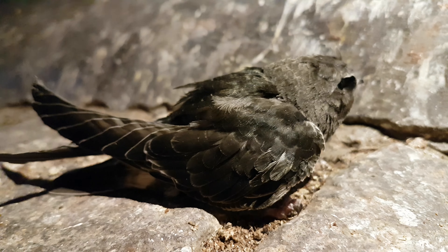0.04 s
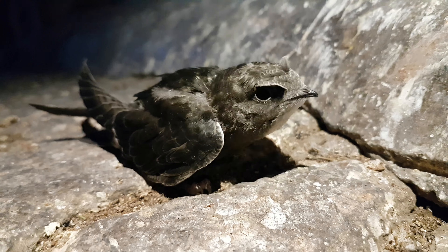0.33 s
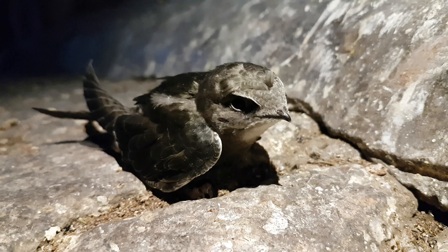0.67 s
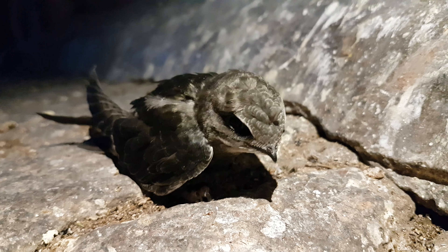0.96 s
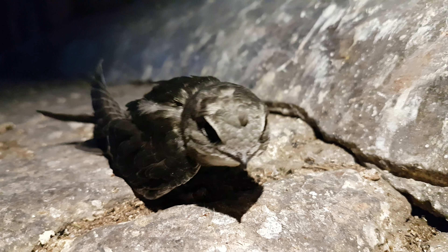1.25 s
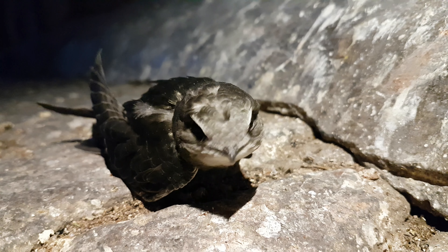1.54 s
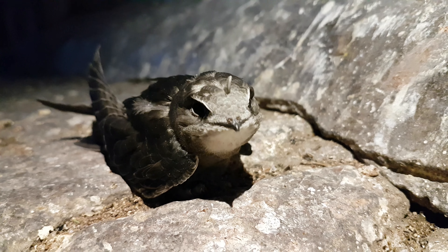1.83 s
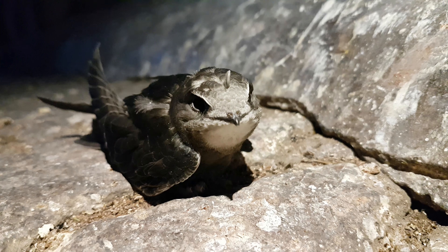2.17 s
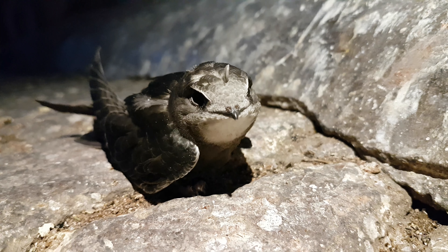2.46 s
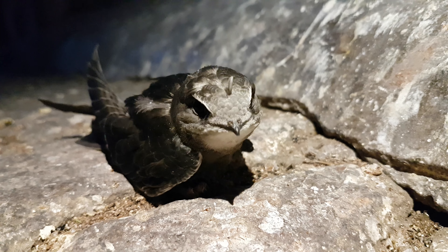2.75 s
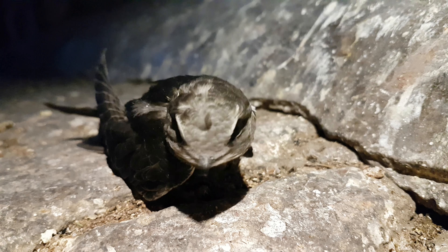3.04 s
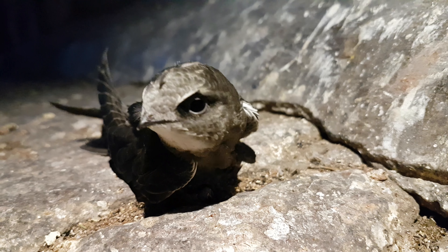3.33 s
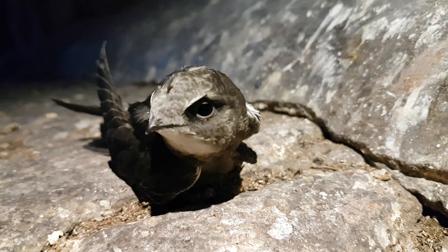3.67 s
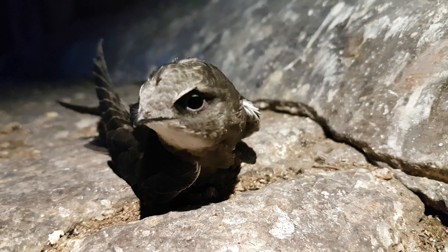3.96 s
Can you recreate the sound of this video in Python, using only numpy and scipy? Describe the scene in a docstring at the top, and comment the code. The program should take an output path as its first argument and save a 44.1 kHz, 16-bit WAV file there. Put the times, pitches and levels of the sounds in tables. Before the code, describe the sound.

Shrill swift screams and rapid trills build into a large chorus beside a stone wall.

```python
"""Faint, shrill screams of swifts cut out for a moment, then swell into a full colony by a stone wall.
Each call is a frequency-modulated whistle with its octave: an arched scream or a trill of falling pips,
made rasping by a fast random tremor. A few birds are close; hundreds more superpose into a shrill wash,
and the wall scatters a short echo. Underneath, the air rumbles softly and one bird scuffs the rock."""
import sys
import numpy as np
from scipy import signal
from scipy.fft import rfft, irfft
from scipy.io import wavfile
from scipy.ndimage import uniform_filter1d

SR = 44100
rng = np.random.default_rng(int(sys.argv[2]) if len(sys.argv) > 2 else 0)


def generate_wav(signal):
    """Clip the signal to [-1, 1] and save it as 16-bit WAV at the path in sys.argv[1]."""
    frames = np.transpose(np.atleast_2d(signal))
    scaled = np.clip(frames, -1, 1) * 32767
    pcm = np.round(scaled).astype(np.int16)
    wavfile.write(sys.argv[1], SR, pcm)


N = 176400
T = np.arange(N) / SR
LEFT_DB, MAX_LAG_S = -2, .0004  # left minus right level (the birds lie to the right); channel delay


def undb(db):
    """Amplitude ratio of a level in decibels."""
    return 10 ** (np.asarray(db) / 20)


def unit(x):
    """Normalisation to rms 1."""
    return x / np.sqrt(np.mean(x ** 2) + 1e-18)


def curve(rows, column=1):
    """Gain envelope: a level column interpolated over time."""
    rows = np.array(rows)
    return undb(np.interp(T, rows[:, 0], rows[:, column]))


def colour(x, points):
    """Spectral shaping by (f/Hz, level/dB) points, with a steep roll-off beyond the ends."""
    hz, db = np.array(points).T
    log_f = np.log(np.maximum(np.fft.rfftfreq(N, 1 / SR), 1))
    beyond = np.abs(log_f - np.clip(log_f, np.log(hz[0]), np.log(hz[-1])))
    return irfft(rfft(x) * undb(np.interp(log_f, np.log(hz), db) - 34 * beyond), N)


def walk(cutoff_hz):
    """Low-pass noise of rms 1: a smooth random modulator."""
    f = np.fft.rfftfreq(N, 1 / SR)
    return unit(irfft(rfft(rng.standard_normal(N)) / (1 + (f / cutoff_hz) ** 4), N))


# Spectrum of the moving air: f/Hz, relative spectral density/dB
AIR_SPECTRUM = [(15, -40), (25, -8.5), (108, 1.5), (193, -2.5), (296, -7), (492, -6.5), (627, -14),
                (1190, -24.5), (1540, -29), (1790, -27.5), (2200, -36), (2860, -59), (4840, -120)]
# Envelopes of the air below and above 250 Hz: t/s, rumble level/dB, wind level/dB
AIR_LEVELS = [(0, -67, -54), (.22, -65, -55.5), (.39, -80.5, -68.5), (.48, -76, -78), (.56, -65, -67),
              (.72, -55, -59.5), (1.26, -47, -49.5), (1.76, -45.5, -44.5), (2.05, -41, -46),
              (3, -40.5, -40), (4, -39.5, -37.5)]


def air():
    """Rumble and soft wind: broadband noise, largely coherent between the channels at low frequency."""
    mid, side = colour(rng.standard_normal((2, N)), AIR_SPECTRUM)
    side = colour(side, [(25, -5), (100, -15.5), (300, -7.5), (700, -5.5), (1200, 5.5), (2500, 10)])
    noise = unit(np.array([mid + side, mid - side]))
    rumble = signal.sosfiltfilt(signal.butter(3, 250, fs=SR, output="sos"), noise)
    wind = noise - rumble
    drone = undb(-9.5) * walk(13.7) * np.sin(2 * np.pi * 194.6 * T)  # a faint, narrow noise band
    flicker = undb(walk(10.5))
    return ((rumble + drone) * curve(AIR_LEVELS, 1) + wind * curve(AIR_LEVELS, 2)) * flicker


# Spectrum of rubbing on rock: f/Hz, relative spectral density/dB
FRICTION_SPECTRUM = [(90, 0), (180, -9.5), (450, -1), (750, -11), (1500, -12.5), (3000, -9)]
# Movements of the bird on the rock: onset t/s, duration/s, level/dB
SCUFF_EVENTS = [(1.541, 0.1, -45.5), (2.571, 0.1, -42.5), (3.174, 0.028, -37.5), (3.625, 0.13, -40)]


def scuffs():
    """Friction noise of feathers and feet on rock: a quick rise and a dull, grainy decay."""
    rub = unit(colour(rng.standard_normal(N), FRICTION_SPECTRUM) * undb(2 * walk(120)))
    envelope = np.zeros(N)
    for start, length, db in SCUFF_EVENTS:
        age = np.maximum(T - start, 0) / length * 3
        envelope += undb(db) * age * np.exp(1 - age)
    return envelope * rub


# Spectrum of the distant calls: f/Hz, relative spectral density/dB
CHORUS_SPECTRUM = [(590, -24), (1000, -34), (1550, -37), (1790, -32), (2130, -32), (2970, -16),
                   (4390, -6.5), (5040, -2), (5340, -0.5), (6790, -11.5), (7440, -18), (8340, -14),
                   (9690, -28.5), (10100, -32.5), (11400, -27), (15000, -26.5), (15500, -22)]
# Balance of distant birds against their middle band: t/s, low-voice level/dB, treble level/dB
CHORUS_BALANCE = [(0, 4.5, -7), (.7, 3.5, -0.5), (1.25, 0.5, 1.5), (1.7, 0.5, 3), (2.2, 3, -2.5),
                  (2.8, 1.5, 2), (3.3, 0, 1.5), (4, 7.5, 4.5)]


def far_chorus():
    """Incoherent superposition: countless distant calls blur into a fluttering band of noise."""
    hiss = unit(colour(rng.standard_normal((2, N)), CHORUS_SPECTRUM))
    low = signal.sosfiltfilt(signal.butter(4, 4400, fs=SR, output="sos"), hiss)
    high = signal.sosfiltfilt(signal.butter(4, 7300, "high", fs=SR, output="sos"), hiss)
    middle = hiss - low - high
    chorus = middle + low * curve(CHORUS_BALANCE, 1) + high * curve(CHORUS_BALANCE, 2)
    flutter = unit(undb(1.09 * walk(400) + 1.33 * walk(32)))
    return chorus * flutter * undb(np.array([[LEFT_DB], [-LEFT_DB]]) / 2)


def wall_echo(x, echo_db, t60_s=.16):
    """Diffuse reflection: the stonework adds a short, exponentially decaying tail to the direct sound."""
    t = T[:SR // 2]
    tail = rng.standard_normal((2, len(t))) * undb(-60 * t / t60_s) * (t > .004)
    tail /= np.sqrt(np.sum(tail ** 2, axis=1, keepdims=True))
    return x + undb(echo_db) * signal.fftconvolve(x, tail, axes=1)[:, :N]


def place(out, call, start, pan_db, lag_s):
    """Localisation: a call is added to both channels with a level and a time difference."""
    for channel, side in enumerate((1, -1)):
        onset = int((start - side * lag_s / 2) * SR)
        a, b = max(onset, 0), min(onset + len(call), N)
        if b > a:
            out[channel, a:b] += call[a - onset:b - onset] * undb(side * pan_db / 2)


def throat(rasp_hz=314, waver_hz=45):
    """Vocal tremor: fast jitter of frequency, fast shimmer of amplitude and a slower waver of pitch."""
    return np.array([walk(rasp_hz), walk(rasp_hz), walk(waver_hz)])


def whistle(hz, tremor, offset, rasp, wobble, octave_db):
    """A tone and its second harmonic, modulated by tremor in amplitude (rasp) and frequency (wobble)."""
    jitter, shimmer, waver = tremor.take(np.arange(len(hz)) + int(offset * N), axis=1, mode="wrap")
    phase = 2 * np.pi * np.cumsum(hz * (1 + wobble * jitter + .0069 * waver)) / SR
    envelope = np.sin(np.pi * np.linspace(0, 1, len(hz)) ** 1.02).clip(0) ** .4
    roughness = unit(np.exp(rasp * np.tanh(shimmer)))
    octave = undb(octave_db) * (hz < SR / 5) * np.sin(2 * phase)  # muted where it would near aliasing
    return np.sqrt(2) * envelope * roughness * (np.sin(phase) + octave)


def arch(length, top_hz, depth, crest=.56):
    """Frequency contour of a scream: a parabola up to a crest and down again."""
    progress = np.linspace(0, 1, max(int(length * SR), 64))
    return top_hz * (1 - depth * (2 * (progress - crest)) ** 2)


def pip(hz, length_s=.0221, fall=.0903):
    """Frequency contour of a pip: a downward chirp, level at first."""
    return hz * (1 - fall * np.linspace(0, 1, int(length_s * SR)) ** 2)


WOBBLE_PER_S = .11  # longer screams are rougher
PIP_SPREAD, PIP_SPREAD_DB, PIP_JITTER_S = .02, 2.5, .003  # pip-to-pip scatter of pitch, level, onset


def flock(count, centre_hz, spread, octave_db, rasp, wobble, scatter_db):
    """Superposition of birds at random times and distances, each scream breaking into an uneven trill."""
    out, tremor = np.zeros((2, N)), throat()
    birds = zip(rng.random((count, 6)), rng.standard_normal((count, 5, 3)).clip(-2, 2))
    for k, ((slot, duration, spacing, nearness, bearing, offset), deviations) in enumerate(birds):
        pitch, side, _ = deviations[0]
        start = (k + slot) / count * (N / SR + .5) - .5
        hz = centre_hz * np.exp(spread * pitch)
        length, gap = .025 + .05 * duration, .043 + .022 * spacing
        db = scatter_db * nearness ** 2
        pan_db, lag_s = LEFT_DB + 2.5 * side, MAX_LAG_S * (2 * bearing - 1)
        roughened = wobble + WOBBLE_PER_S * length
        scream = whistle(arch(length, hz, depth=.1), tremor, offset, rasp, roughened, octave_db)
        place(out, undb(db) * scream, start, pan_db, lag_s)
        for j, (late, sharp, loud) in enumerate(deviations[1:]):
            at = start + length + (j + .5) * gap + PIP_JITTER_S * late
            call = whistle(pip(hz * (1 + PIP_SPREAD * sharp)), tremor, offset + at, rasp, wobble, octave_db)
            place(out, undb(db + PIP_SPREAD_DB * loud) * call, at, pan_db, lag_s)
    return unit(wall_echo(out, echo_db=-6.5))


# Envelope of the flocks and the far chorus: t/s, relative level/dB
COLONY_SWELL = [(0, -30), (.1, -34), (.2, -37), (.3, -38.5), (.39, -46), (.48, -41), (.55, -28.5),
                (.71, -22), (.9, -17), (1.1, -12.5), (1.27, -8.5), (1.4, -6), (1.6, -4), (1.85, 0),
                (2.25, 0.5), (2.6, 1), (3.1, 3), (3.55, 2), (3.9, -3), (4, -4)]


def colony():
    """Independent sources add in power: five flocks and the far chorus swell under one envelope."""
    main = flock(48, centre_hz=5380, spread=.035, octave_db=-22, rasp=.4, wobble=.006, scatter_db=7.5)
    harsh = flock(70, centre_hz=5740, spread=.07, octave_db=-22, rasp=.87, wobble=.0303, scatter_db=7)
    low = flock(60, centre_hz=4400, spread=.075, octave_db=-16, rasp=.5, wobble=.014, scatter_db=4)
    thin = flock(26, centre_hz=8490, spread=.0264, octave_db=-25, rasp=.4, wobble=.014, scatter_db=3)
    bright = flock(50, centre_hz=6230, spread=.08, octave_db=-1.5, rasp=.96, wobble=.0107, scatter_db=0)
    voices = (undb(-22) * main + undb(-25) * harsh + undb(-32) * curve(CHORUS_BALANCE, 1) * low
              + undb(-37) * thin + undb(-36) * bright + undb(-21) * far_chorus())
    return voices * curve(COLONY_SWELL)


# Close screams: onset t/s, duration/s, crest f/Hz, arch depth/1, relative level/dB, octave level/dB
CLOSE_SCREAMS = [ (-.03, 0.11, 5620, .06, -49, -24), (.02, .11, 7900, 0.15, -62, -20),
                 (.2, 0.096, 6160, 0.1, -53, -23), (0.705, 0.027, 5800, 0.074, -38.5, -8),
                 (.84, 0.067, 6300, 0.24, -50, 0), (.88, .095, 7500, .03, -65, 17),
                 (1.036, 0.074, 5980, 0.14, -33, -10), (1.16, 0.05, 5620, .1, -29, -12),
                 (1.18, 0.12, 6120, .05, -36, -14), (1.1, .11, 5450, 0.052, -31.5, -27),
                 (1.22, .1, 5320, .05, -27.5, -23), (1.441, .05, 5900, .05, -27, -13),
                 (1.321, 0.05, 5700, .1, -39, 0), (1.53, .1, 6330, .09, -24.5, -20),
                 (1.56, .09, 5300, .06, -29, -7), (1.79, 0.15, 9550, .22, -32.5, -25),
                 (1.8, 0.091, 7000, 0.091, -44, 4), (2.32, 0.044, 6130, 0.052, -19.5, -32),
                 (2.357, 0.05, 6080, 0.07, -15.5, -22), (2.335, 0.094, 8540, .05, -22.5, -23),
                 (2.41, 0.038, 6210, 0.051, -17.5, -20), (2.559, 0.025, 9800, .04, -29.5, -25),
                 (2.58, 0.017, 6750, 0.094, -15, -25), (2.615, 0.14, 6890, .05, -21, -20),
                 (2.69, 0.058, 9640, 0.034, -34, -25), (2.81, .11, 5740, 0.043, -19, -18),
                 (2.9, 0.092, 9270, 0.054, -31, -25), (2.955, 0.025, 5370, 0.072, -12, -23),
                 (3.029, 0.017, 5240, 0.036, -10.5, -32), (3.098, 0.015, 5470, 0.026, -17.5, -21),
                 (3.18, 0.036, 9470, 0.014, -23, -25), (3.215, 0.054, 8500, 0.036, -22.5, -25),
                 (3.284, 0.043, 9350, 0.034, -24, -25), (3.329, 0.012, 5400, 0.086, -13.5, -19),
                 (3.485, 0.058, 5590, .1, -16, -24), (3.505, 0.041, 6570, .09, -26, -3),
                 (3.69, 0.041, 7350, .04, -27, -9), (3.737, 0.017, 5400, 0.036, -18, -28),
                 (3.76, 0.051, 5450, 0.0546, -18, -30), (3.837, 0.038, 5060, 0.036, -17.5, -34),
                 (3.894, 0.022, 5120, 0.037, -16.5, -28), (3.948, 0.077, 6270, 0.028, -23.5, -9),
                 (3.953, 0.09, 7050, .06, -25.5, -9)]
# Close trills: onset t/s, end t/s, pip rate/Hz, f/Hz, relative level/dB, octave level/dB
CLOSE_TRILLS = [(.228, .34, 21, 8600, -81, -20), (0.774, .87, 16.4, 5450, -35, -21),
                (1.033, 1.11, 19, 3950, -49, -7), (1.643, 1.99, 18, 5455, -20.5, -20),
                (2.023, 2.22, 17.8, 6450, -33.5, -3.5), (2.03, 2.3, 18.5, 5490, -25, -41),
                (2.537, 2.86, 20, 5850, -23, -16), (3.138, 3.27, 17, 5050, -17, -18),
                (3.552, 3.76, 17, 5850, -31.5, -1), (3.689, 3.86, 22.7, 3850, -28, -13)]


def close_swifts(rasp=.34, wobble=.0039):
    """Direct sound dominates for the nearest birds, so each scream and trill stands out of the chorus."""
    out, tremor = np.zeros((2, N)), throat()
    draws = rng.random((len(CLOSE_SCREAMS), 2))
    for (start, length, hz, depth, db, octave_db), (offset, bearing) in zip(CLOSE_SCREAMS, draws):
        roughened = wobble + WOBBLE_PER_S * length
        scream = whistle(arch(length, hz, depth), tremor, offset, rasp, roughened, octave_db)
        side = bearing - .5
        place(out, undb(db) * scream, start, LEFT_DB + 3 * side, MAX_LAG_S * side / 4)
    draws = rng.standard_normal((len(CLOSE_TRILLS), 12, 4)).clip(-1.5, 1.5)
    for (start, end, rate, hz, db, octave_db), deviations in zip(CLOSE_TRILLS, draws):
        for at, (late, sharp, loud, bright) in zip(np.arange(start, end, 1 / rate), deviations):
            contour = pip(hz * (1 + PIP_SPREAD * sharp))
            call = whistle(contour, tremor, at, rasp, wobble, octave_db + 4 * bright)
            place(out, undb(db + PIP_SPREAD_DB * loud) * call, at + PIP_JITTER_S * late, LEFT_DB, 0)
    return undb(-.5) * wall_echo(out, echo_db=-5)


def scene():
    """Linear superposition of the colony, the close birds, the air and the scuffs."""
    return colony() + close_swifts() + air() + scuffs()


def record(dry):
    """A gate cuts the sound briefly, soft saturation rounds the peaks and a low-pass removes the top."""
    gate = uniform_filter1d(1. * ((T < .405) | (T > .468)), size=200)
    rounded = dry / (1 + (dry / .9) ** 8) ** (1 / 8)
    return signal.sosfilt(signal.ellip(10, .2, 75, 15600, fs=SR, output="sos"), gate * rounded)


dry = scene()
out = record(dry)
generate_wav(out)
```